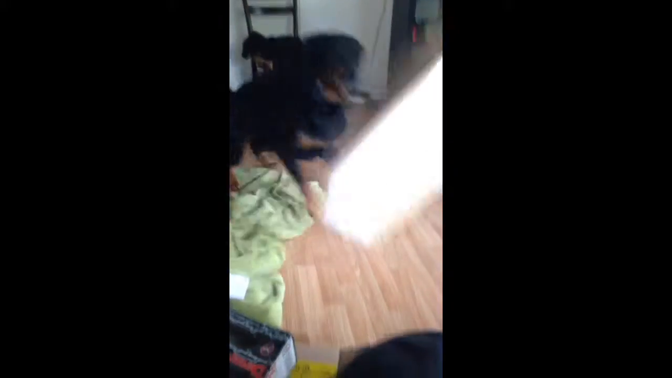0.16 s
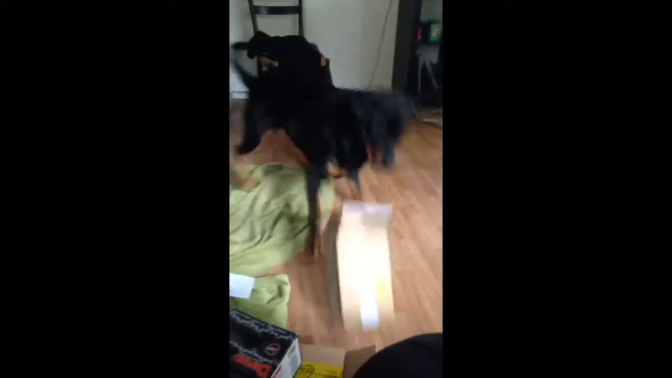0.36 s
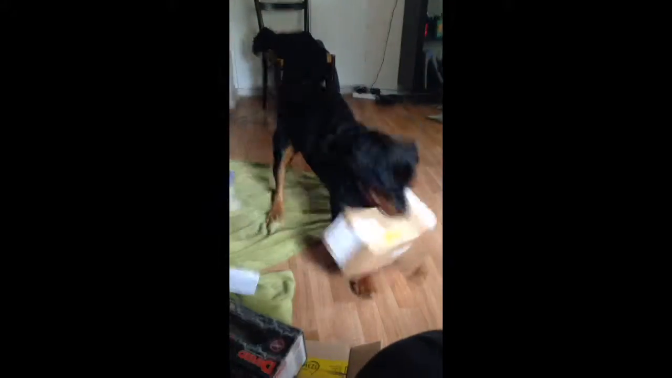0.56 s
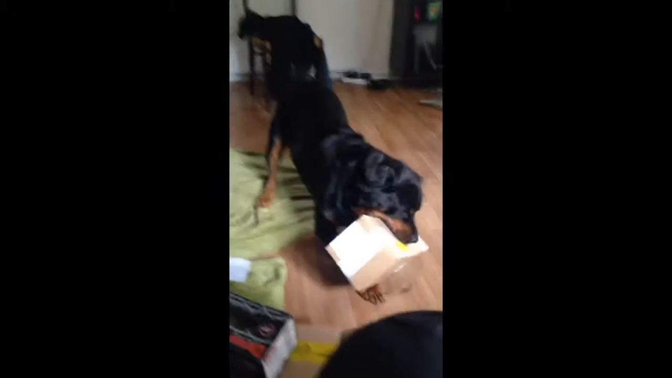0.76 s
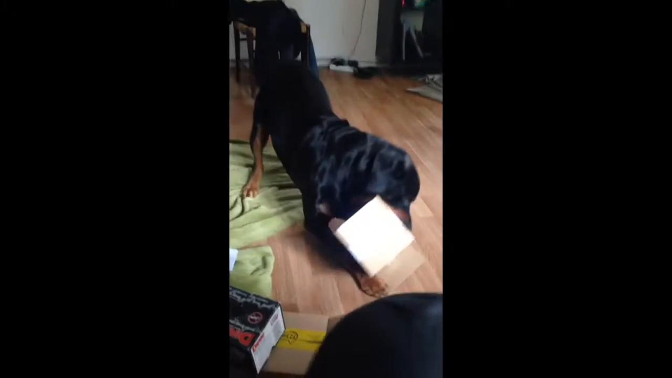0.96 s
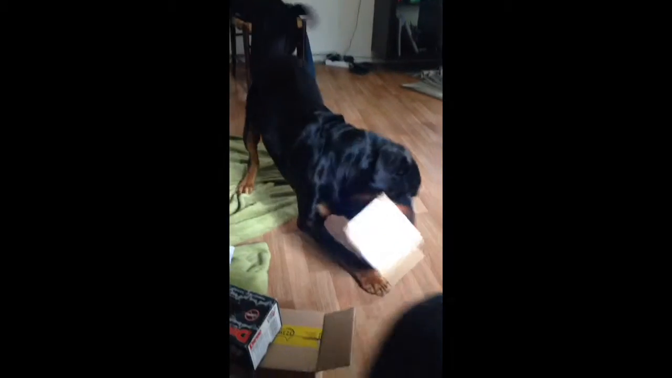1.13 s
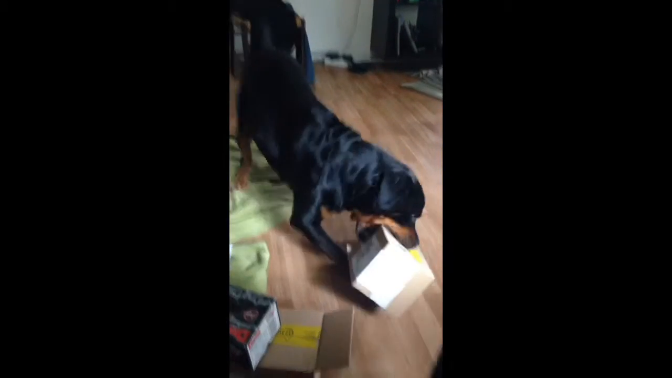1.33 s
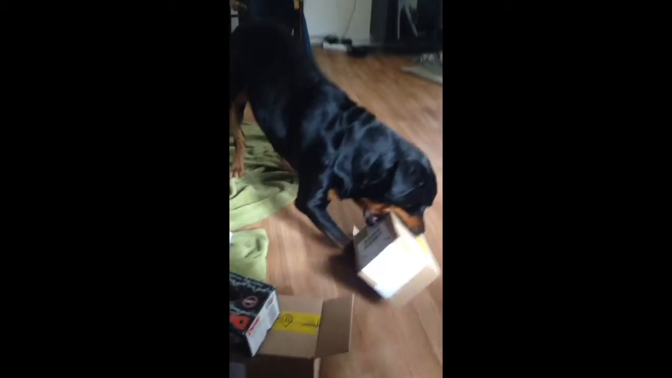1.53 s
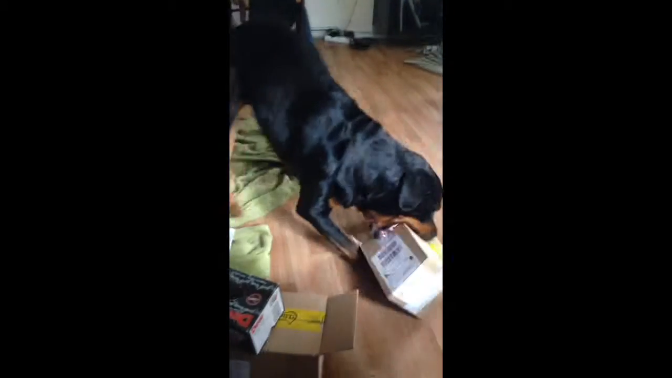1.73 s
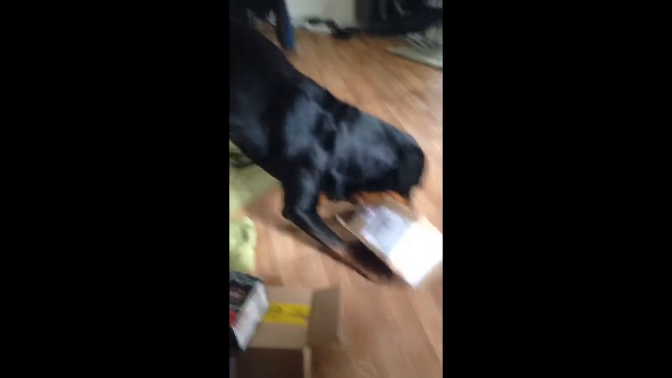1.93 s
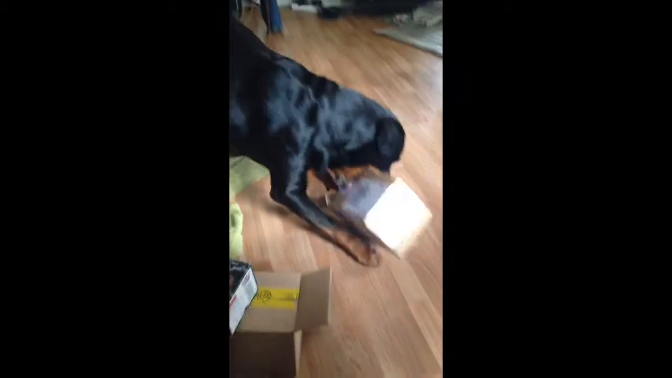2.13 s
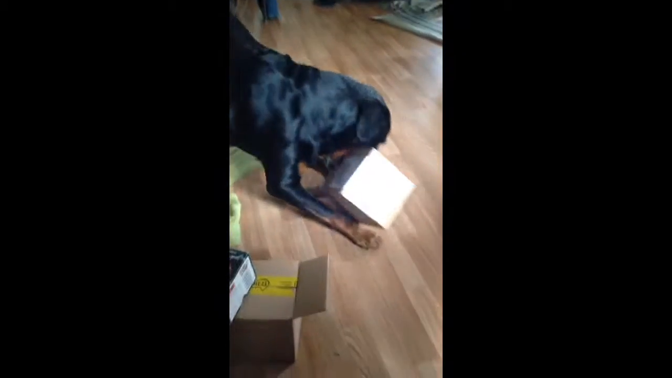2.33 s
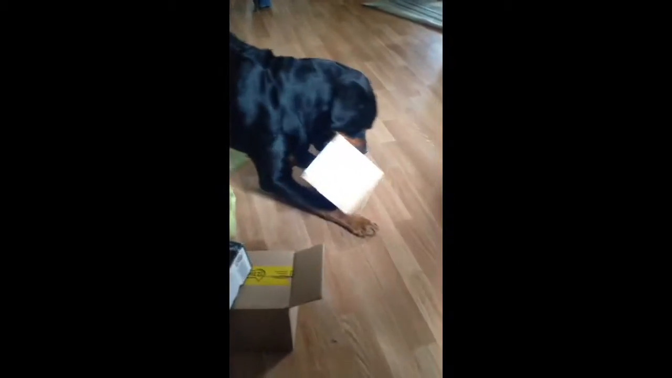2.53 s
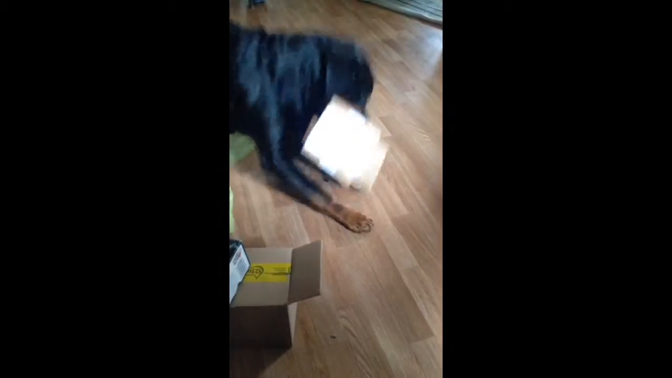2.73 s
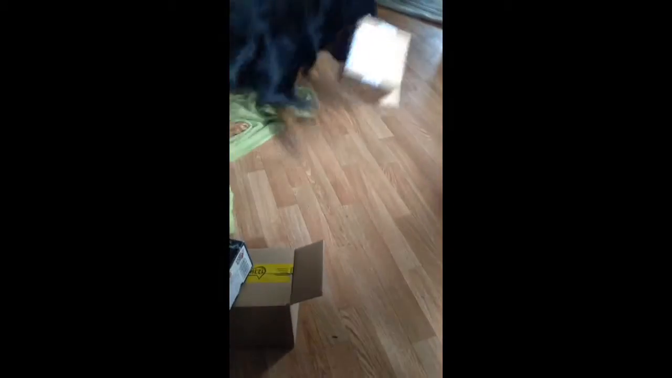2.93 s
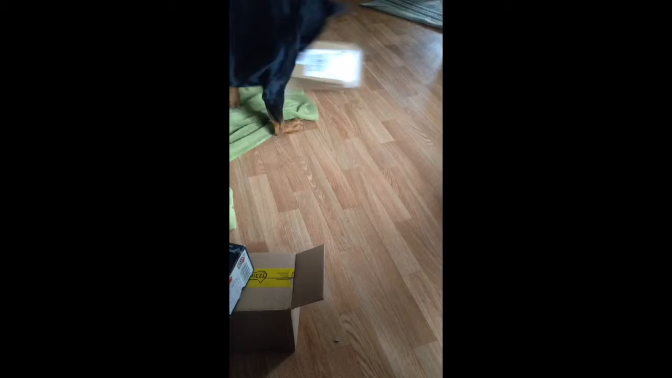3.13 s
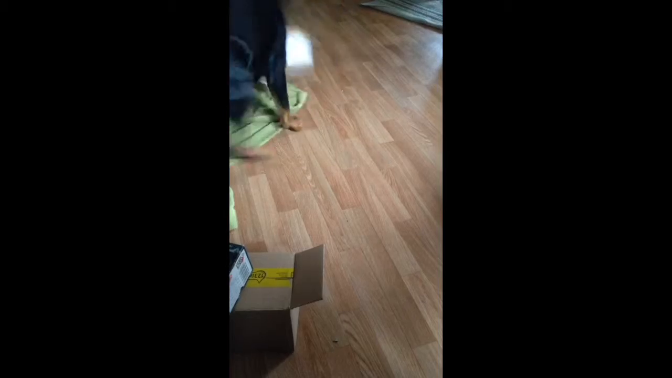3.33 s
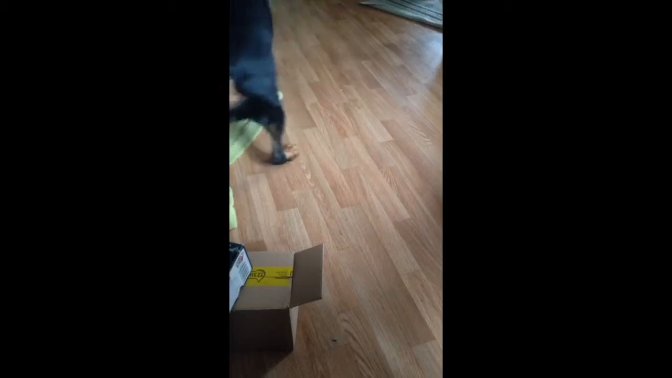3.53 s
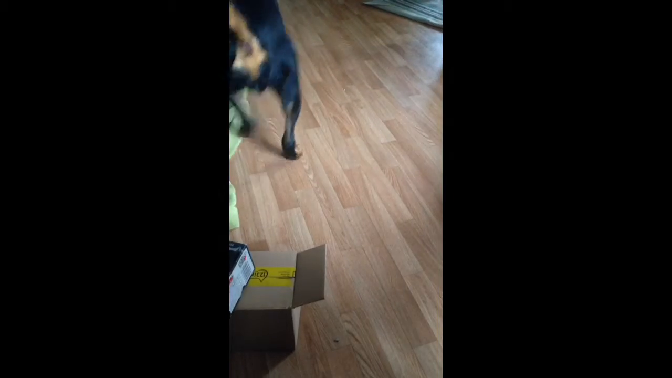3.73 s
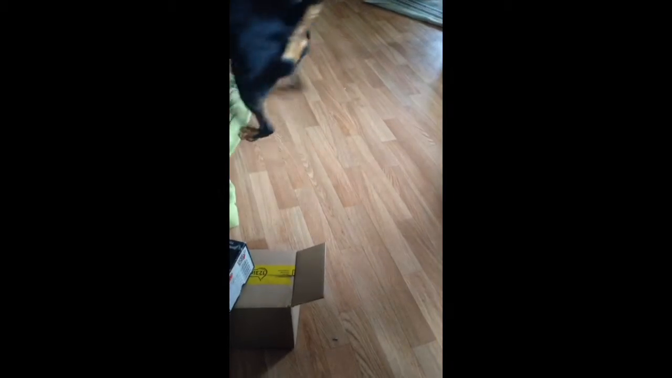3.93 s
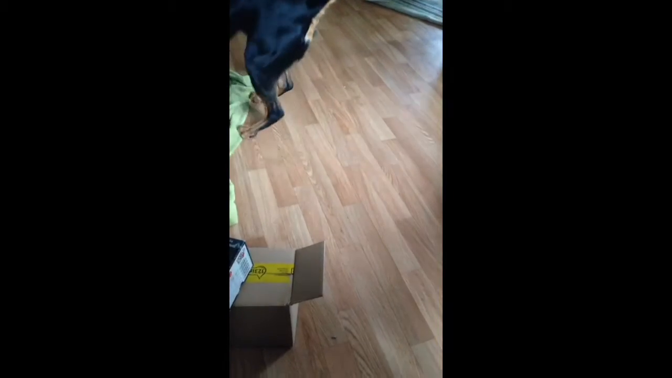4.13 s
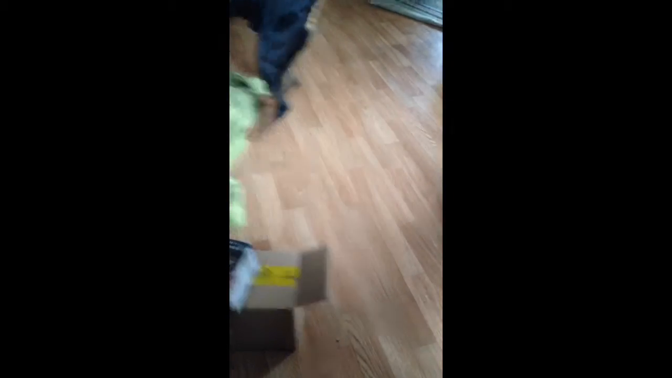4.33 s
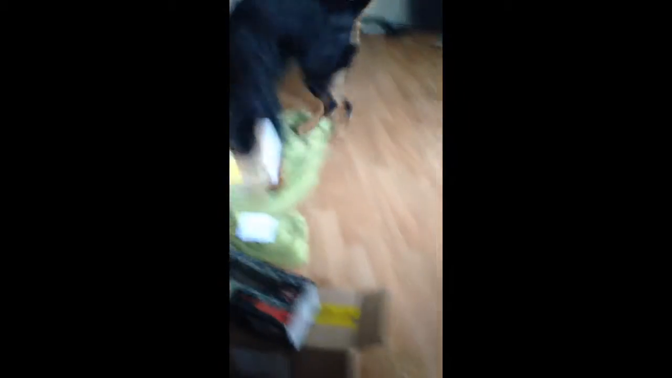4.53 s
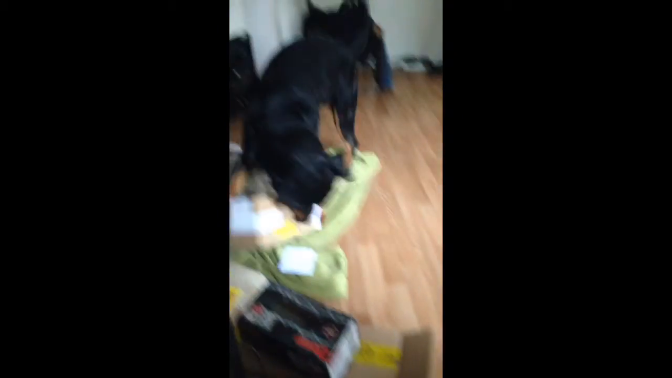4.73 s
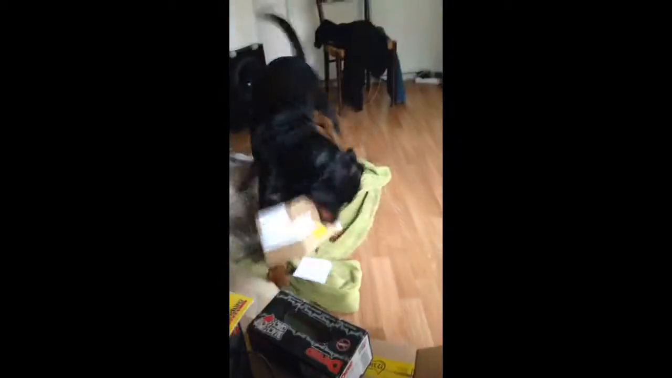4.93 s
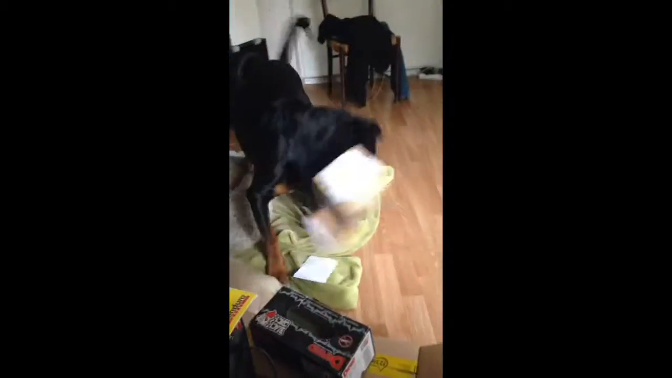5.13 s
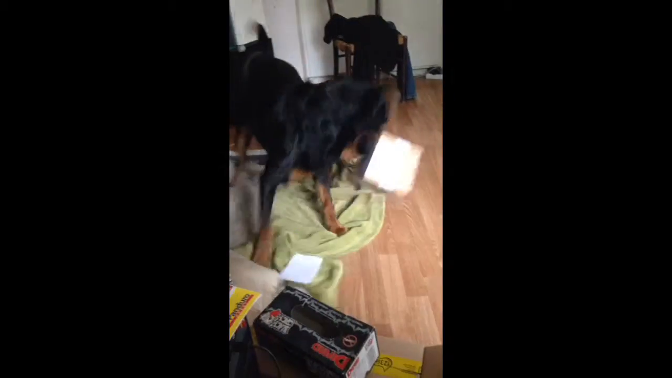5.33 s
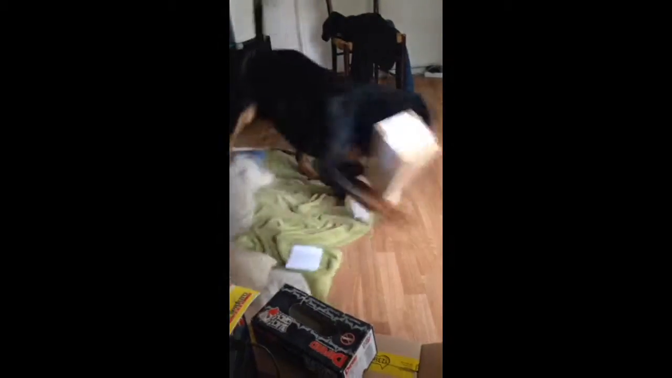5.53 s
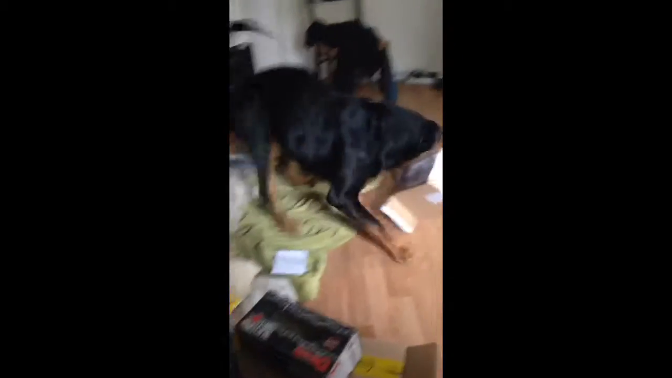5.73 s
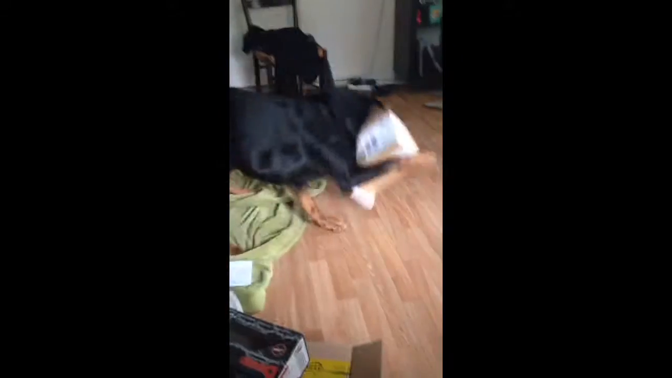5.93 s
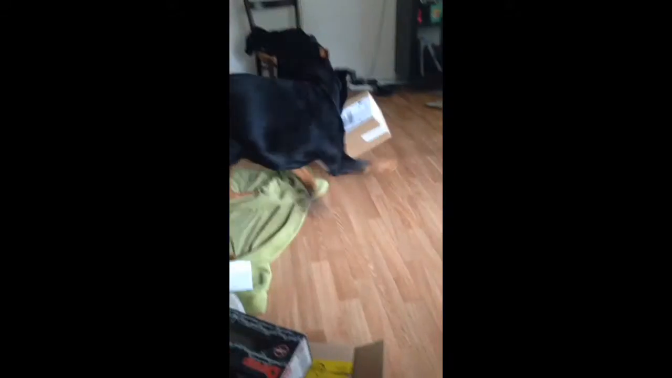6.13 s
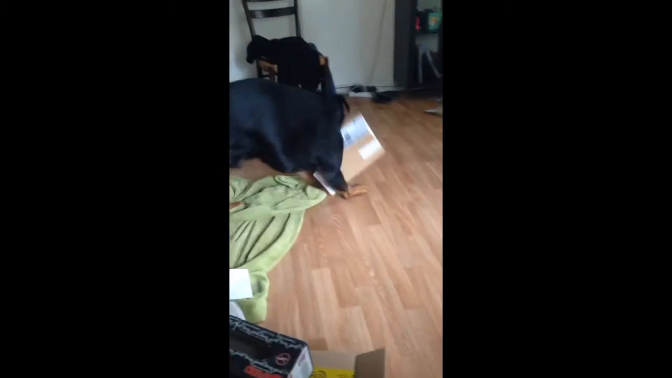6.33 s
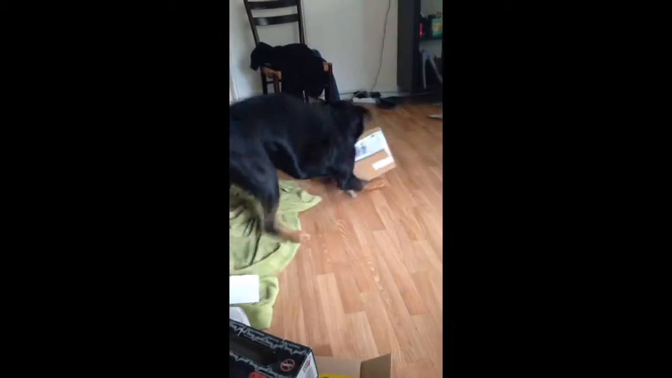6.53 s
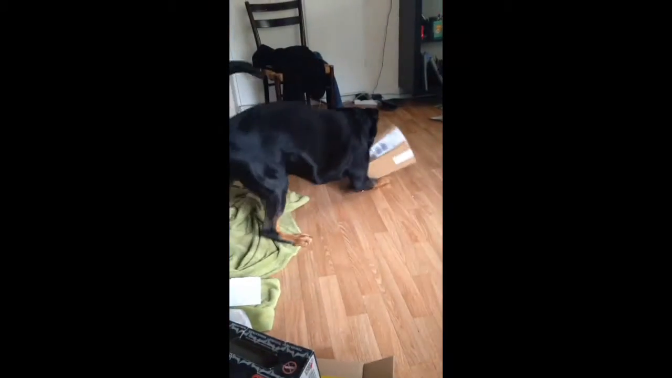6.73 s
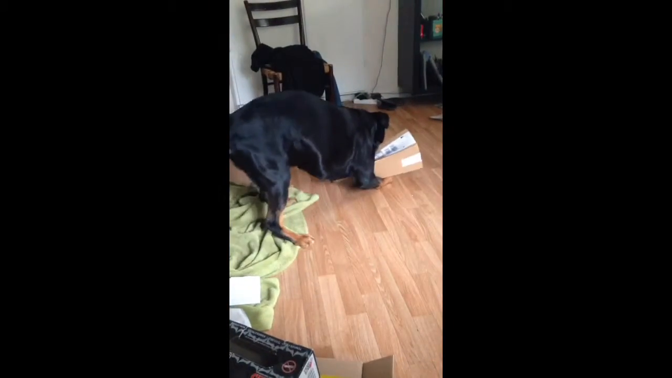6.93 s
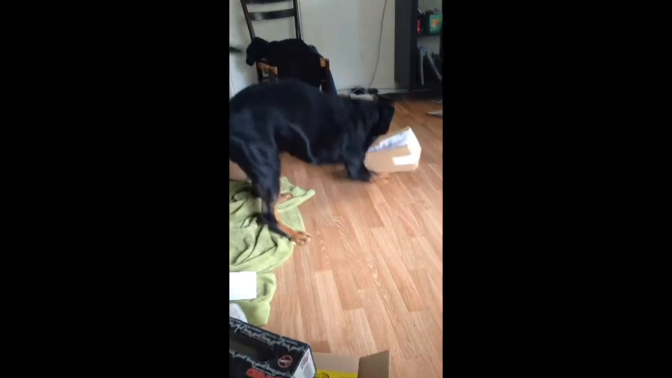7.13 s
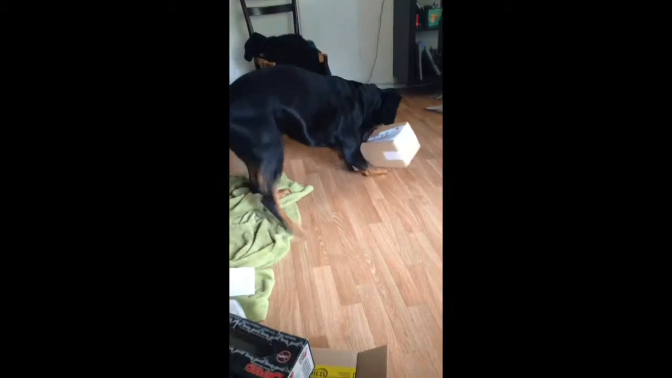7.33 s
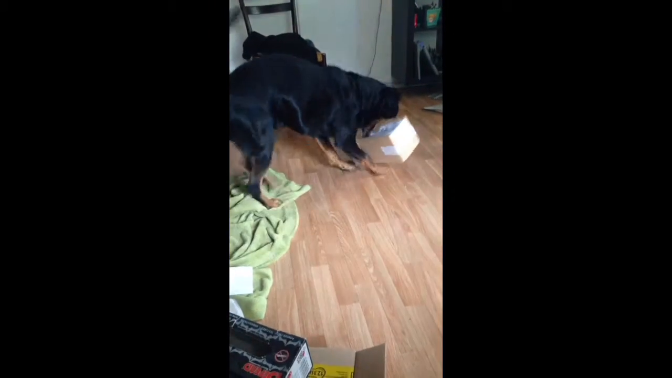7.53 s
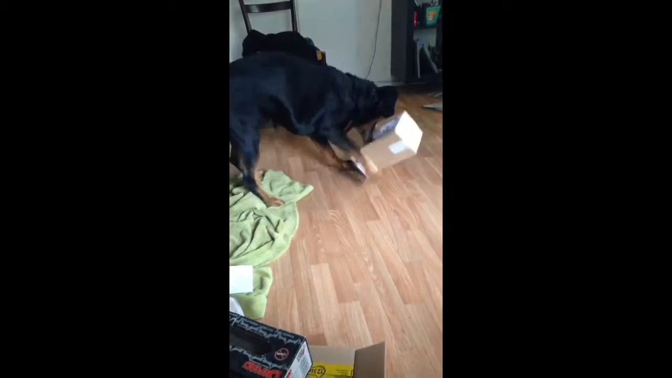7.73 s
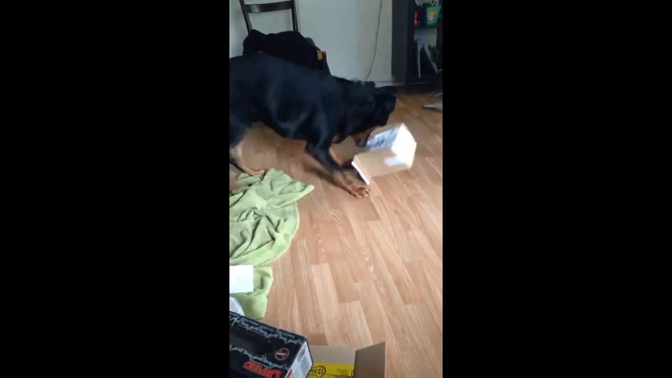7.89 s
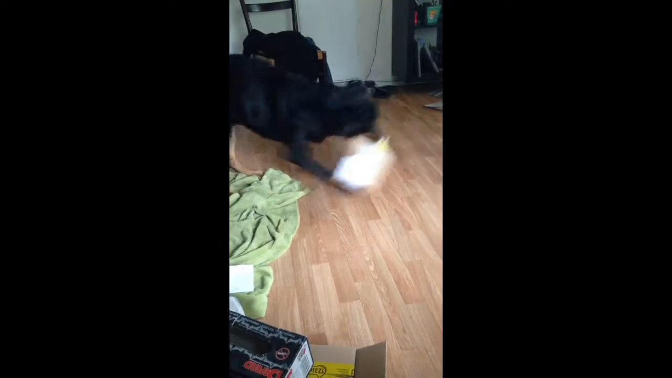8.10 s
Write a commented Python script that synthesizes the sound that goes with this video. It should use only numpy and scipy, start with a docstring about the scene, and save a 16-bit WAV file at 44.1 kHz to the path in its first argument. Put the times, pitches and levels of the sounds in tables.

```python
"""Over faint room noise, a soft rustle and a bump lead into hard, hollow blows on a cardboard box.
A big dog bites, shoves and drops the small box on the laminate floor of a living room.
Each blow booms in the hollow box, knocks its panels and crushes a few flutes, which crackle.
Shoves slide it in short strokes of random tiny slips and its creases tick; teeth and claws click
and scrape as brief resonances, and decaying noise makes the furnished room answer briefly."""
import sys
import numpy as np
from scipy import signal
from scipy.io import wavfile
from scipy.ndimage import uniform_filter1d

SR = 44100
rng = np.random.default_rng(int(sys.argv[2]) if len(sys.argv) > 2 else 0)


def output_pcm(signal):
    """Save a mono or channel-first signal as 16-bit PCM at the path in sys.argv[1].

    Samples are clipped to [-1, 1] before scaling.
    """
    pcm = np.clip(np.atleast_2d(signal).T, -1, 1) * 32767
    wavfile.write(sys.argv[1], SR, np.round(pcm).astype(np.int16))


N = 359856  # length in samples

# Hard blows, the box slammed or dropped. Each row: start in seconds, time scale of the contact in
# seconds, boom pitch in Hz, boom level in dB, panel pitch in Hz, then knock, crunch and snap levels
# in dB, and extra room echo in dB.
BLOWS = [(0.339, 0.0058, 177, -13.5, 448, -20, -28, -30, -4),
         (0.3425, 0.0026, 260, -26, 620, -39, -36.5, -34.5, -5),
         (0.477, 0.0023, 190, -38, 340, -45.5, -50.5, -53, 0),
         (0.568, 0.022, 178.6, -27.5, 507, -25, -46.5, -59, -2.5),
         (0.6, 0.0025, 200, -26.5, 473, -41, -55, -49, -10),
         (0.728, 0.0056, 176, -30, 323, -32.5, -42.5, -48.5, -0.5),
         (0.743, 0.0063, 228, -31.5, 375, -33.5, -47, -61, -6),
         (0.872, 0.0021, 159, -38.5, 380, -46, -49, -54.5, 2),
         (1.375, 0.008, 260, -44.5, 720, -43, -48, -55.5, 0.5),
         (1.715, 0.0025, 274, -55, 507, -38, -59, -63, -10),
         (2.071, 0.0039, 166, -43, 350, -57, -63, -59.5, -7),
         (3.065, 0.0067, 133, -35.5, 357, -40.5, -55.5, -64, -7),
         (3.59, 0.018, 117.6, -30.5, 397, -29.5, -39.5, -75, -7),
         (3.817, 0.0011, 215, -41, 394, -53, -54.5, -60, -0.5),
         (4.834, 0.0021, 132, -33, 516, -41, -41, -41.5, -3.5),
         (5.061, 0.0067, 228.6, -36.5, 597, -37.5, -64, -65, 2),
         (5.636, 0.0046, 150, -32, 407, -38.5, -46, -51.5, -0.5),
         (5.661, 0.013, 274.4, -29.5, 424, -34, -45, -74, 2),
         (5.915, 0.0051, 207, -23, 392, -34, -33.5, -42, -3.5),
         (6.323, 0.0067, 180, -33, 327, -38, -46.5, -50.5, 1.5),
         (6.653, 0.0082, 227, -39, 332, -43, -44, -45, 0.5),
         (7.586, 0.007, 203, -44, 328, -47, -51, -47.5, -0.5)]
# Soft bumps of paw and muzzle. Each row: start in seconds, time scale of the contact in seconds,
# boom pitch in Hz, boom level in dB, knock level in dB.
BUMPS = [(0.263, 0.0083, 159, -33.5, -44), (0.498, 0.0076, 119, -37.5, -51),
         (0.683, 0.035, 156, -35.5, -41), (0.95, 0.0054, 188, -44, -57), (1.17, 0.025, 159, -47, -55),
         (1.253, 0.02, 174.4, -42.5, -48.5), (1.583, 0.0039, 220, -42, -52.5),
         (1.678, 0.029, 205, -47.5, -45.5), (2.118, 0.0083, 224, -39.5, -60),
         (2.511, 0.02, 200, -47.5, -57), (3.288, 0.13, 120, -49, -88), (3.437, 0.011, 162, -43.5, -56.5),
         (3.597, 0.0074, 165, -28, -46), (3.726, 0.0032, 201, -40, -52), (4.083, 0.0038, 157, -47.5, -53.5),
         (4.519, 0.0053, 250, -49.5, -79), (4.621, 0.0036, 175, -40.5, -55),
         (5.557, 0.027, 163, -40, -49.5), (5.682, 0.0042, 180.7, -33.5, -49), (5.761, 0.011, 192, -40, -44),
         (5.842, 0.013, 128, -41, -46), (5.918, 0.0016, 127, -28.5, -47), (6.389, 0.021, 192.4, -31, -45),
         (6.565, 0.0064, 241, -46.5, -53), (7.606, 0.0071, 215, -38.5, -55), (7.744, 0.0043, 204, -42, -53),
         (7.857, 0.0056, 222, -49.5, -56), (8.1, 0.013, 199, -48, -49)]
# Bites that crush the flutes. Each row: start in seconds, time scale of the contact in seconds,
# crunch level in dB, snap level in dB.
BITES = [(0.579, 0.024, -49.5, -53), (0.949, 0.00078, -50.5, -50), (1.041, 0.014, -56, -63),
         (1.311, 0.0014, -60.5, -59.5), (2.125, 0.019, -58.5, -66), (2.303, 0.0038, -69, -59),
         (2.527, 0.0047, -55.5, -57), (2.797, 0.0061, -59.5, -68), (4.877, 0.012, -49.5, -65),
         (4.895, 0.0069, -67, -53.5), (5.127, 0.0043, -63, -60), (5.576, 0.0038, -49, -53.5),
         (5.966, 0.012, -50, -54), (6.337, 0.0019, -48.5, -55.5), (6.528, 0.004, -66, -59.5),
         (7.011, 0.00094, -54.5, -61), (7.026, 0.0029, -61, -64), (7.074, 0.002, -61.5, -74),
         (7.308, 0.012, -54.5, -62.5), (7.825, 0.0018, -56, -66), (7.861, 0.0013, -61, -65),
         (7.991, 0.0027, -56.5, -62)]
# Ways the hollow box can ring. Each row: pitch in Hz, relative strength in dB, time to die by 60 dB in seconds.
BOX_MODES = [(119, -1.5, 0.17), (154, 3, 0.14), (178.8, -4.5, 0.22), (239.6, 4, 0.12), (278, -2.5, 0.2)]
# Ways its stiff panels can ring, with the same columns.
PANEL_MODES = [(376, 14, 0.048), (434, -9, 0.12), (584.4, -2.5, 0.14), (780, 11, 0.0413), (870, 6, 0.053)]
# Higher rings of the small flaps, with the same columns.
FLAP_MODES = [(1295, -1, 0.096), (1354, 7.5, 0.18), (1850, 5, 0.12), (2125, 7, 0.041), (2305, 4, 0.086),
              (2383, 5.5, 0.11)]
# Tone colours of the knock, crunch and snap in a blow. Each row: frequency in Hz, relative level in dB.
KNOCK_COLOUR = [(150, -34), (300, 2), (550, 2), (900, -9), (1250, -18), (3000, -50)]
CRUNCH_COLOUR = [(500, -41), (950, 7.5), (1400, 8.5), (2000, 9), (2400, 4.5), (3100, -7), (4500, -16),
                 (9000, -37)]
SNAP_COLOUR = [(1200, -26.5), (2800, 3), (3600, 1.5), (5300, 0), (7000, -2.5), (9000, -7), (13000, -9.5),
               (15500, -20.5)]


def blows():
    """Each contact pushes the hollow box, rings a panel and breaks a cluster of fibres."""
    t, out = np.arange(16384) / SR, np.zeros(N)
    knock, crunch, snap = click(KNOCK_COLOUR), click(CRUNCH_COLOUR), click(SNAP_COLOUR)
    contacts = BLOWS + [bump(*row) for row in BUMPS] + [bite(*row) for row in BITES]
    for row, tail in zip(contacts, room_tails(t, count=len(contacts))):
        s, contact, boom_hz, boom_db, panel_hz, knock_db, crunch_db, snap_db, room_db = row
        contact = max(contact, 0.001)  # never shorter than 1 ms
        fibres = fibre_burst(t, contact, per_s=4000, spread_db=4.2, touch=0.75)

        # the quicker the contact, the more its cracks differ in size
        crack_spread_db = 3 + 4 * np.exp(-contact / 0.008)
        cracks = levelled(fibre_burst(t, contact, per_s=6000, spread_db=crack_spread_db, touch=0.45))
        # the snapping flutes of a contact share one brief pitch
        flute = ring(t[:512], rng.uniform(2800, 5000), t60=0.004)
        crack = evened(coloured(cracks, snap)) + 0.3 * evened(coloured(cracks, flute))

        # large surfaces take a moment to swing up
        swing = 1 - np.exp(-(7.1 * t / contact) ** 2)
        heave = 1 - np.exp(-(t / (0.4 * contact + 0.0036)) ** 2)

        # the boom lasts longest near the main resonance of the box
        main_hz = BOX_MODES[2][0]
        boom_t60 = 0.058 + 0.057 * np.exp(-((boom_hz - main_hz) / 10) ** 2)
        box = struck(t, around(BOX_MODES, boom_hz))
        boom = heave * (ring(t, boom_hz, boom_t60) + 0.31 * box)
        boom += 0.054 * heave * ring(t, hz=59.6, t60=0.19)  # the floor gives a little

        panels = struck(t, around(PANEL_MODES, panel_hz))
        panel = swing * (ring(t, panel_hz, t60=0.07) + 0.42 * panels)
        clack = evened(coloured(fibres, knock)) + 0.71 * evened(panel)
        flaps = swing * struck(t, FLAP_MODES, detune=0.015)
        crush = evened(coloured(fibres, crunch)) + 0.36 * evened(flaps)

        tail = tail * gain_of(room_db)
        add(out, s, heard(boom, tail, boom_db, wet_db=-7.0))
        add(out, s, heard(clack, tail, knock_db, wet_db=2.5))
        add(out, s, heard(crush, tail, crunch_db, wet_db=2.0))
        add(out, s, heard(crack, tail, snap_db, wet_db=-1.0))
    return out


# crunch and snap in dB relative to the bump's knock
BUMP_PANEL_HZ, BUMP_CRUNCH_DB, BUMP_SNAP_DB = 385.7, -10, -18.5


def bump(s, contact, boom_hz, boom_db, knock_db):
    """A padded blow rings the widest panel and hardly crushes anything."""
    crunch_db, snap_db = knock_db + BUMP_CRUNCH_DB, knock_db + BUMP_SNAP_DB
    return s, contact, boom_hz, boom_db, BUMP_PANEL_HZ, knock_db, crunch_db, snap_db, 0


# boom and knock in dB relative to the bite's crunch
BITE_BOOM_HZ, BITE_BOOM_DB, BITE_PANEL_HZ, BITE_KNOCK_DB, BITE_ROOM_DB = 216, -1.5, 783, 0, -2


def bite(s, contact, crunch_db, snap_db):
    """A blow of the teeth presses on the flutes until they crush and snap."""
    boom_db, knock_db = crunch_db + BITE_BOOM_DB, crunch_db + BITE_KNOCK_DB
    return s, contact, BITE_BOOM_HZ, boom_db, BITE_PANEL_HZ, knock_db, crunch_db, snap_db, BITE_ROOM_DB


# A flat face claps on the floor. Each row: start in seconds, pitch of the face in Hz, level in dB,
# overtones in dB relative to the main ring, time for the main ring to die by 60 dB in seconds.
SLAPS = [(0.34, 834, -28.5, -18, 0.049), (0.568, 549, -33.5, -1, 0.094), (0.7295, 746, -29, -27, 0.029),
         (1.255, 846, -51, -2, 0.025), (1.376, 620, -40, -18, 0.019), (1.716, 350, -36.5, -22, 0.075),
         (3.067, 690, -52, -9, 0.078), (3.590, 579, -27.5, -20, 0.11), (3.725, 865, -49.5, 3, .03),
         (5.559, 595, -46, -20, 0.06), (5.6615, 794, -34.5, -5.5, 0.025), (5.915, 906, -34.5, 1, 0.033),
         (7.592, 491, -46, -20, 0.066)]
# Overtones of a face. Each row: multiple of its pitch, relative level in dB.
FACE_OVERTONES = [(1.5, -9), (1.8, -16.5), (2.35, -11.5)]
FACE_T60_S = 0.043  # all overtones die by 60 dB in this time


def slaps():
    """A face that lands flat rings with a hollow note; stronger overtones make it brighter."""
    t, out = np.arange(8192) / SR, np.zeros(N)
    for (s, hz, db, overtones_db, t60), tail in zip(SLAPS, room_tails(t, count=len(SLAPS))):
        overtones = sum(gain_of(mode_db) * ring(t, multiple * hz, FACE_T60_S)
                        for multiple, mode_db in FACE_OVERTONES)
        onset = np.minimum(t / 0.001, 1)
        face = onset * (ring(t, hz, t60) + gain_of(overtones_db) * overtones)
        add(out, s, heard(face, tail, db, wet_db=-9))
    return out


# A claw, a tooth or a corner of the box clicks on something hard.
# Each row: start in seconds, pitch in Hz, level in dB.
CLICKS = [(0.344, 3730, -34.5), (0.478, 3680, -54), (0.871, 3310, -56.5), (0.948, 4770, -56),
          (2.071, 3850, -58), (2.075, 1570, -59.5), (3.817, 1650, -52.5)]
# The ring of a click. Each row: multiple of its pitch, relative level in dB, time to die by 60 dB in seconds.
CLICK_MODES = [(1, 8.5, 0.019), (1.47, -2, 0.018), (1.8, -3, 0.021)]


def claw_clicks():
    """A hard tap rings a few quickly dying modes: crisp, pitched ticks with little room on them."""
    t, out = np.arange(8192) / SR, np.zeros(N)
    for (s, hz, db), tail in zip(CLICKS, room_tails(t, count=len(CLICKS))):
        tick = sum(gain_of(mode_db) * ring(t, multiple * hz, t60)
                   for multiple, mode_db, t60 in CLICK_MODES)
        add(out, s, heard(tick, tail, db, wet_db=-12))
    return out


# Shoves that slide the box over the floor. Each row: start in seconds, length in seconds,
# strength of the edge's rubbing in dB, strength of the paper's brushing in dB (both before the mix below).
SHOVES = [(0.38, 0.094, -48.5, -65), (0.59, 0.13, -48.5, -53.5), (0.94, 0.45, -58, -57.5),
          (1.33, 0.16, -54, -57.5), (1.49, 0.38, -64, -67.5), (1.8, 0.24, -62, -68),
          (2.3, 0.31, -61, -65.5), (2.41, 0.43, -58.5, -58), (2.57, 0.24, -61.5, -68),
          (2.8, 0.16, -65.5, -65), (3.335, 0.12, -60, -70), (3.59, 0.12, -43, -56), (3.67, 0.14, -56, -53),
          (3.88, 0.65, -63, -54.5), (4.87, 0.087, -54, -51), (5.395, 0.4, -59, -54.5),
          (5.67, 0.25, -48.5, -57), (5.95, 0.14, -74, -55.5), (6.33, 0.31, -66, -66),
          (6.56, 0.29, -55, -56.5), (6.87, 0.28, -58, -67), (7.02, 0.24, -66, -63),
          (7.16, 0.55, -66.5, -63.5), (7.56, 0.24, -57.5, -84), (7.78, 0.085, -52.5, -65),
          (7.93, 0.14, -56, -61)]
# Tone colours of the rubbing. Each row: frequency in Hz, relative level in dB.
JUDDER_COLOUR = [(30, -18), (55, -25), (100, -2), (140, -20), (182, -9), (225, -10), (390, -11),
                 (520, -42.5), (1000, -41)]
RASP_COLOUR = [(250, -21), (400, 3.5), (600, -0.5), (850, 2.5), (1200, -5.5), (1900, -3), (2800, -14.5),
               (5000, -39.5)]
HISS_COLOUR = [(1200, -29), (2500, 4.5), (3600, 3), (6000, -3.5), (9000, -6.5), (13000, -11.5),
               (15500, -13)]
# from the first grab on, the box never lies quite still (strengths as in the shoves)
GRAB_S, FIDGET_RUB_DB, FIDGET_BRUSH_DB = 0.22, -71, -71.5


def sliding():
    """Cardboard on laminate: its edge rasps, the box judders along, and the paper face hisses."""
    held = np.arange(N) / SR > GRAB_S
    rub = np.hypot(strokes(SHOVES, axis=2), gain_of(FIDGET_RUB_DB) * held)
    brush = np.hypot(strokes(SHOVES, axis=3), gain_of(FIDGET_BRUSH_DB) * held)
    judder = friction(click(JUDDER_COLOUR), per_s=2300, spread_db=1.0, uneven_db=4)
    rasp = friction(click(RASP_COLOUR), per_s=4000, spread_db=3, uneven_db=3)
    hiss = friction(click(HISS_COLOUR), per_s=7000, spread_db=3.8, uneven_db=1.2)
    edge = gain_of(-4.5) * judder + gain_of(1.5) * rasp
    return rub * edge + gain_of(-1.25) * brush * hiss


# Teeth and claws scrape over the ribs of the cardboard. Each row: start in seconds, length in seconds,
# first pitch in Hz, last pitch in Hz, level in dB.
SCRAPES = [(0.646, 0.02, 1200, 1510, -49.5), (0.78, 0.026, 630, 780, -43.5),
           (1.036, 0.041, 2160, 1790, -49), (1.039, 0.025, 720, 547, -44.5), (2.32, 0.17, 370, 435, -60),
           (2.864, 0.028, 3170, 2870, -56), (3.336, 0.034, 2050, 1940, -65), (3.429, 0.02, 1980, 1940, -54),
           (3.685, 0.044, 2350, 1850, -49.5), (4.883, 0.0395, 1500, 1910, -47),
           (7.301, 0.024, 1050, 806, -57), (7.457, 0.035, 870, 730, -55), (7.785, 0.046, 664, 885, -52.5),
           (7.938, 0.015, 2450, 2300, -56), (8.1, 0.027, 855, 674, -59)]
# Tone colour of creases and bare scrapes. Each row: frequency in Hz, relative level in dB.
CREASE_COLOUR = [(200, -13), (500, 12.5), (1000, 2), (2000, -2), (3500, -5), (7000, -13.5), (15000, -15)]
# average ribs caught per second, resonance width as a share of the first pitch, bare rasp in dB
RIBS_PER_S, SCRAPE_WIDTH, SCRAPE_RASP_DB = 600, 0.13, -12


def scrapes():
    """A tooth or claw catches ribs at random moments; the spot's pitch glides as it travels."""
    t, out = np.arange(8192) / SR, np.zeros(N)
    rasp_colour = click(CREASE_COLOUR)
    for (s, length, first_hz, last_hz, db), tail in zip(SCRAPES, room_tails(t, count=len(SCRAPES))):
        progress = np.minimum(t / length, 1)
        pressure = np.sqrt(progress * (1 - progress))
        catches = pressure * grains(len(t), RIBS_PER_S, spread_db=3)
        pitch = first_hz + (last_hz - first_hz) * progress
        spot = resonate(catches, pitch, SCRAPE_WIDTH * first_hz)
        rasp = evened(coloured(catches, rasp_colour))
        scrape = evened(spot) + gain_of(SCRAPE_RASP_DB) * rasp
        add(out, s, heard(scrape, tail, db, wet_db=-5))
    return out


# Thin, very bright crackles, probably packing tape.
# Each row: start in seconds, time scale of the burst in seconds, level in dB.
TAPE = [(0.579, 0.0053, -52), (0.595, 0.011, -49), (0.727, 0.008, -51), (6.642, 0.005, -56)]
# Their tone colour. Each row: frequency in Hz, relative level in dB.
TAPE_COLOUR = [(3000, -37), (8000, -9), (12000, 6), (14500, 1), (16000, 6)]


def tape():
    """Many tiny breaks in a short burst make a thin, bright crackle."""
    t, out = np.arange(8192) / SR, np.zeros(N)
    colour = click(TAPE_COLOUR)
    for (s, length, db), tail in zip(TAPE, room_tails(t, count=len(TAPE))):
        crackle = fibre_burst(t, length, per_s=3000, spread_db=4, touch=0.5)
        add(out, s, heard(coloured(crackle, colour), tail, db, wet_db=-5))
    return out


# Steady pulls that drag the box. Each row: start in seconds, length in seconds, level in dB.
PULLS = [(3.98, 0.37, -51.5), (4.22, 0.23, -51)]
# Resonances of the dragged box. Each row: pitch in Hz, width of each filter pass in Hz, relative level in dB.
DRAG_MODES = [(1740, 500, -11), (2480, 520, 0), (3030, 700, -2)]
DRAG_WANDER = 0.04  # typical (rms) wander, as a share of the pitch


def drag():
    """Steady rubbing makes a thin rush in a few resonances, whose pitches wander at random."""
    slips = friction(signal.unit_impulse(2), per_s=5700, spread_db=-1.5, uneven_db=6.0)
    rush = 0
    for hz, width, db in DRAG_MODES:
        pitch = hz * (1 + DRAG_WANDER * slow_noise(2500, 1500))
        once = resonate(slips, pitch, width)
        rush = rush + gain_of(db) * evened(resonate(once, pitch, width))
    return strokes(PULLS) * evened(rush)


# level in dB while only held, and level in dB relative to a shove's rubbing strength
CREASE_DB, CREASE_SHOVED_DB = -73, -22


def creases():
    """The bent cardboard ticks at random, more strongly while it is shoved."""
    held = np.arange(N) / SR > GRAB_S
    shoved = gain_of(CREASE_SHOVED_DB) * strokes(SHOVES, axis=2)
    strain = np.hypot(shoved, gain_of(CREASE_DB) * held)
    return strain * friction(click(CREASE_COLOUR), per_s=65, spread_db=5, uneven_db=2, wet=0.5)


# Tone colour of the still air. Each row: frequency in Hz, relative level in dB.
AIR_COLOUR = [(20, -31), (53, -8.5), (100, -21), (185, -4.5), (240, -14.5), (480, -25), (1900, -29.5),
              (15500, -37)]
AIR_DB = -60


def still_air():
    """The quiet room is a steady, faint noise with its own tone colour."""
    noise = rng.standard_normal(N)
    return gain_of(AIR_DB) * evened(coloured(noise, click(AIR_COLOUR, size=8192)))


# Reverberation of the room. Each row: frequency in Hz, time to die by 60 dB in seconds.
ROOM = [(100, 0.32), (260, 0.2343), (700, 0.2222), (1840, 0.24), (4850, 0.236), (14000, 0.23)]


def room_tails(t, count):
    """Echoes for several places on the floor, each band dying at its own speed; energy 1."""
    noise = rng.standard_normal((count, len(t)))
    hz, age, bands = signal.stft(noise, SR, nperseg=256)
    decay = gain_of(-60 * age / read(ROOM, hz)[:, None])
    tails = signal.istft(bands * decay, SR, nperseg=256)[1][:, :len(t)]
    tails *= np.clip(t / 0.0064, 0, 1)  # echoes build up over 6.4 ms
    return tails / np.linalg.norm(tails, axis=1, keepdims=True)


def heard(x, tail, db, wet_db):
    """Adds the room, and sets the level of the first 35 ms."""
    x = x + gain_of(wet_db) * coloured(x, tail)
    return gain_of(db) * x / (np.std(x[:round(0.035 * SR)]) + 1e-12)


def fibre_burst(t, contact, per_s, spread_db, touch):
    """A first touch, then fibres break as the force swells and lets go; a few give way afterwards."""
    force = t / contact * np.exp(-2.6 * t / contact)
    after = 0.016 * np.exp(-t / 0.03) * grains(len(t), per_s=300, spread_db=4)
    burst = force * grains(len(t), per_s, spread_db)
    # the slower the contact, the weaker its first tap, which comes after 1 ms
    tap_size = touch * np.exp(-contact / 0.01) * np.linalg.norm(burst)
    tap = tap_size * signal.unit_impulse(len(t), round(0.001 * SR))
    return tap + burst + after


def friction(colour, per_s, spread_db, uneven_db, wet=0.88):
    """Many tiny slips catch and let go unevenly; their echoes keep shifting between two places."""
    catch = slow_noise(700, 300)
    slips = grains(N, per_s, spread_db) * gain_of(uneven_db * catch)
    here, there = room_tails(np.arange(SR // 3) / SR, count=2)
    turn = 2 * np.pi * 3.4 * np.arange(N) / SR  # 3.4 turns per second
    echo = coloured(slips * np.cos(turn), here) + coloured(slips * np.sin(turn), there)
    return evened(coloured(slips + wet * echo, colour))


# the box gathers speed, glides and is braked by friction: shares of a stroke's length
SPEED_UP, SLOW_DOWN = 0.16, 0.43


def strokes(rows, axis=2):
    """Rubbing strength over time: each stroke speeds up, glides and stops; axis picks its dB column."""
    out = np.zeros(N)
    for row in rows:
        start, length = row[:2]
        progress = np.arange(0, length, 1 / SR) / length
        speed = np.clip(np.minimum(progress / SPEED_UP, (1 - progress) / SLOW_DOWN), 0, 1)
        add(out, start, gain_of(row[axis]) * speed)
    return out


# how much less a mode rings the further it lies from the pitch of the contact
OFF_PITCH_DB_PER_OCTAVE = 5.5


def around(modes, centre_hz):
    """A contact wakes mostly the modes near its own pitch."""
    return [(hz, db - OFF_PITCH_DB_PER_OCTAVE * abs(np.log2(hz / centre_hz)), t60)
            for hz, db, t60 in modes]


def struck(t, modes, detune=0.012):
    """A set of modes; how strongly each rings depends on where the box is held and hit (random here)."""
    total = 0
    for hz, db, t60 in modes:
        strength = rng.uniform(-1.03, 1) * gain_of(db)
        pitch = hz * (1 + detune * rng.uniform(-1.04, 1))
        total = total + strength * ring(t, pitch, t60)
    return total


def ring(t, hz, t60):
    """One mode: a sine that dies by 60 dB in t60 seconds."""
    return np.sin(2 * np.pi * hz * t) * gain_of(-60 * t / t60)


def resonate(x, hz, width):
    """A resonance that follows the pitch curve hz; a greater width in Hz makes it die sooner."""
    turn = np.exp(2j * np.pi * np.cumsum(hz) / SR)
    r = np.exp(-np.pi * width / SR)
    return (turn * signal.lfilter([1 - r], [1, -r], x / turn)).real


def grains(count, per_s, spread_db):
    """Random tiny clicks of varied size, on average per_s each second; rms 1."""
    size = gain_of(spread_db * np.minimum(rng.exponential(1, count), 4))
    size = size * rng.choice([-1, 1], count)
    return evened(size * (rng.random(count) < per_s / SR))


def slow_noise(first_size, second_size):
    """Noise smoothed by two moving averages (lengths in samples) drifts slowly; rms 1."""
    once = uniform_filter1d(rng.standard_normal(N), size=first_size)
    return evened(uniform_filter1d(once, size=second_size))


def levelled(x):
    """Evens out broad humps in the spectrum and keeps the attack: tearing fibres have no pitch."""
    spectrum = np.fft.fft(x)
    power = uniform_filter1d(abs(spectrum) ** 2, size=128, mode="wrap")
    correction = np.exp(np.conj(signal.hilbert(-0.5 * np.log(power))))
    return np.fft.ifft(spectrum * correction).real


def click(spectrum, size=2048):
    """The shortest causal (minimum-phase) click that has this spectrum."""
    log_gain = np.log(gain_of(read(spectrum, abs(np.fft.fftfreq(size, 1 / SR)))))
    return np.fft.ifft(np.exp(np.conj(signal.hilbert(log_gain)))).real[:size // 2]


def coloured(x, colour):
    """Filters x by a click or an echo tail."""
    return signal.fftconvolve(x, colour)[:len(x)]


def read(points, hz):
    """Reads a table along a log-frequency axis."""
    f, value = np.transpose(points)
    return np.interp(np.log(hz + 1), np.log(f + 1), value)


def gain_of(db):
    """Decibels to amplitude."""
    return 10 ** (np.asarray(db) / 20)


def evened(x):
    """Scales to rms 1."""
    return x / np.sqrt(np.mean(x ** 2) + 1e-20)


def add(mix, s, sound):
    """Mixes a sound in at time s in seconds."""
    part = mix[max(round(s * SR), 0):][:len(sound)]
    part += sound[:len(part)]


def scene():
    """The box and the quiet room around it, as one channel."""
    impacts = blows() + slaps() + claw_clicks()
    rubbing = sliding() + scrapes() + tape() + drag() + creases()
    return (impacts + rubbing + still_air())[None]


EDGE_HZ = 15650  # upper limit of the recorder


def record(dry):
    """The recorder's band limit: a steep low-pass filter."""
    lowpass = signal.firwin(511, EDGE_HZ, window=("kaiser", 9), fs=SR)
    return signal.oaconvolve(dry, lowpass[None], "same")


dry = scene()
out = record(dry)
output_pcm(out)
```